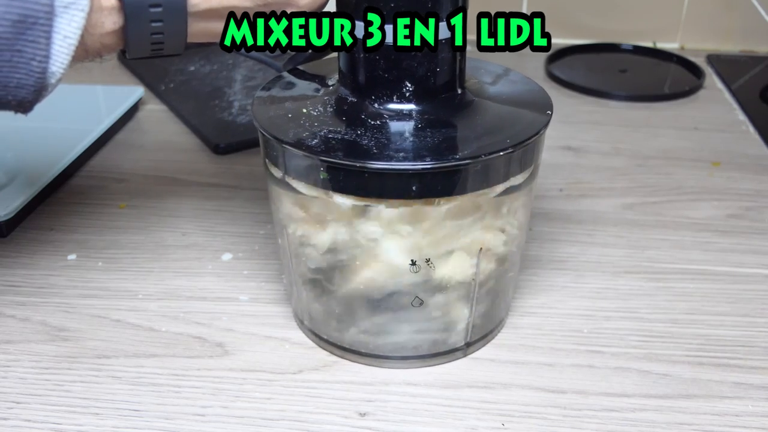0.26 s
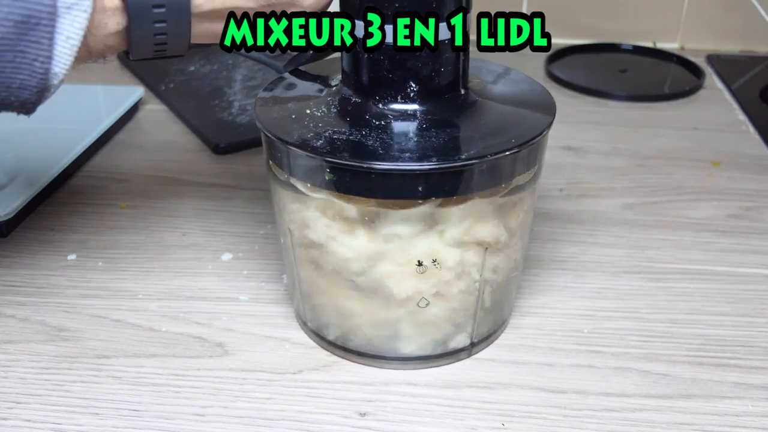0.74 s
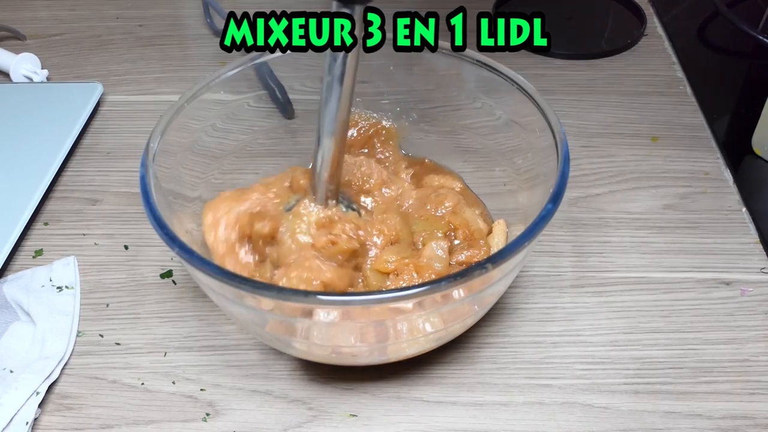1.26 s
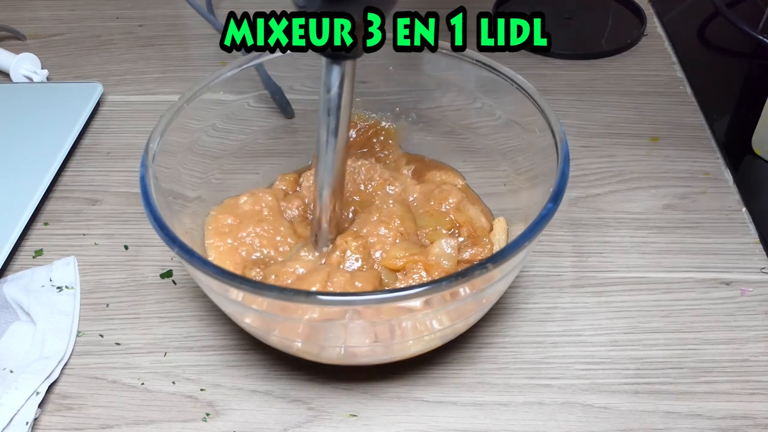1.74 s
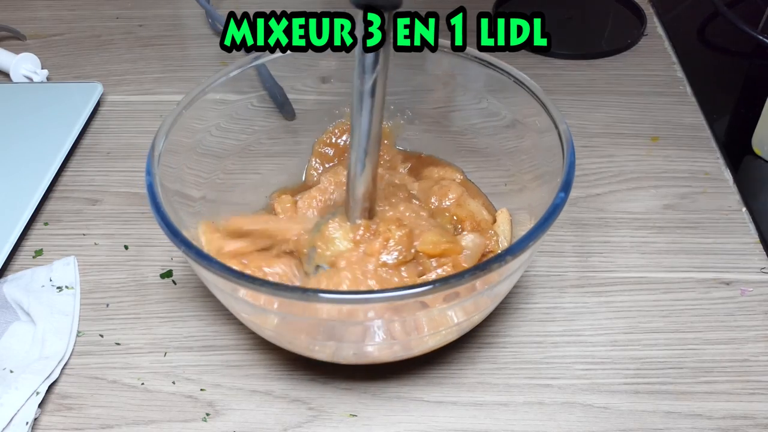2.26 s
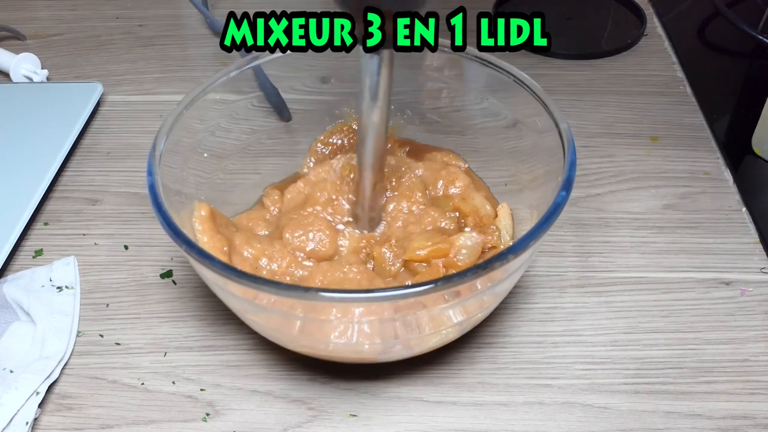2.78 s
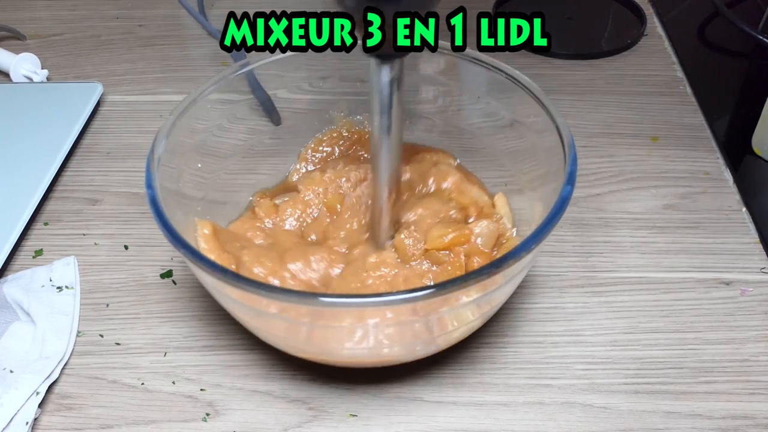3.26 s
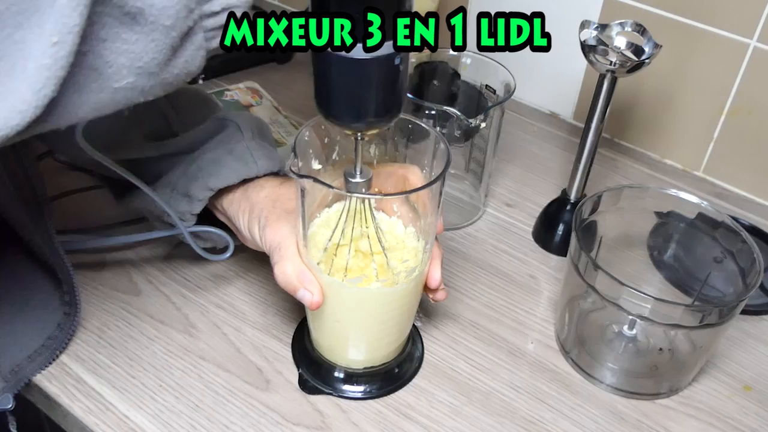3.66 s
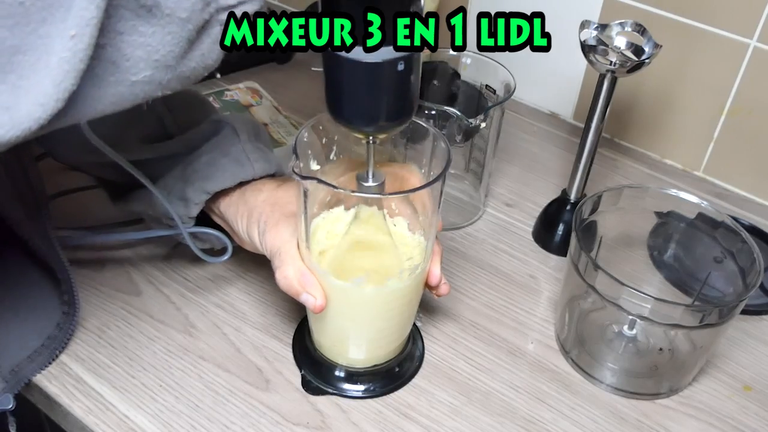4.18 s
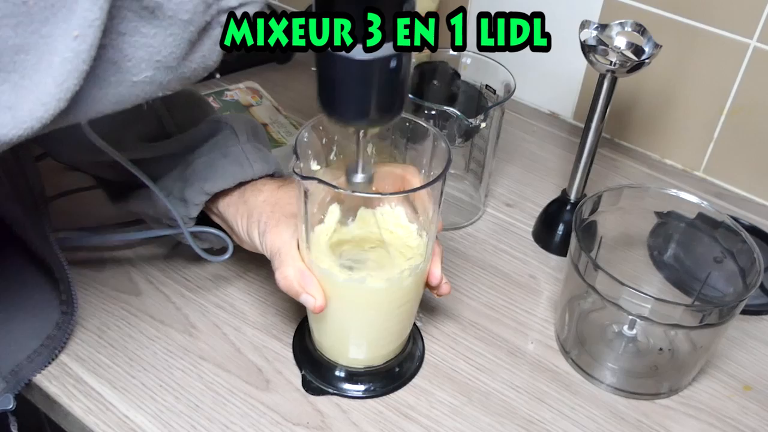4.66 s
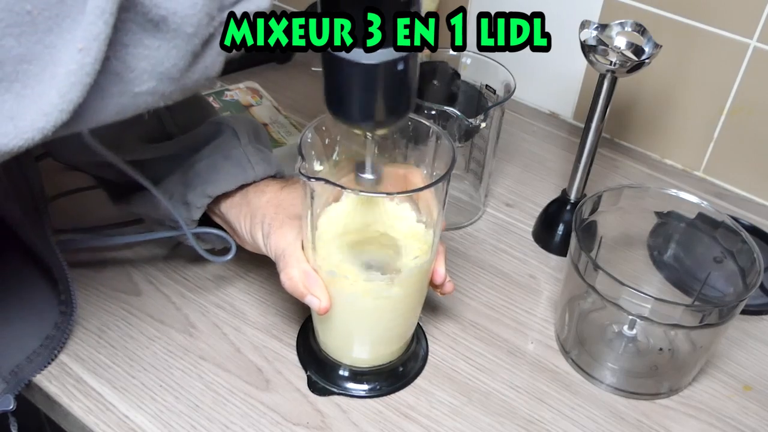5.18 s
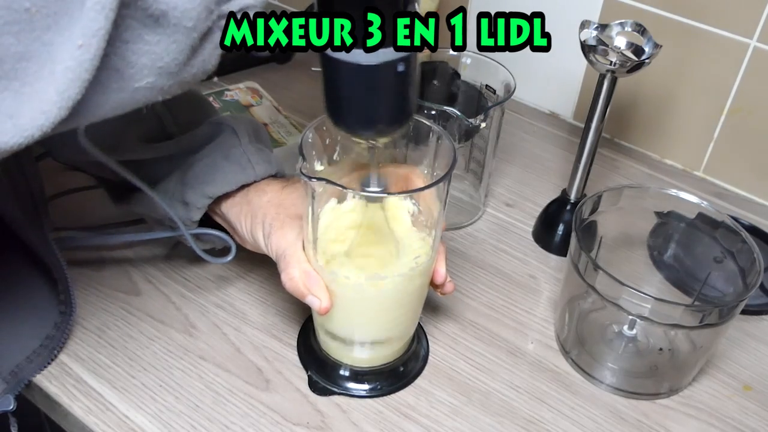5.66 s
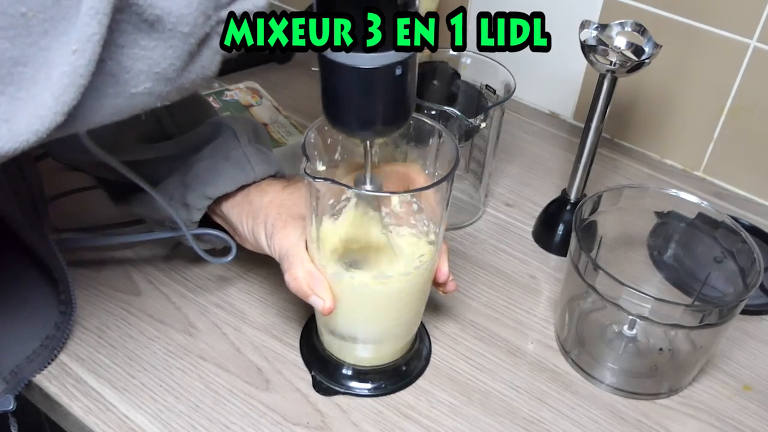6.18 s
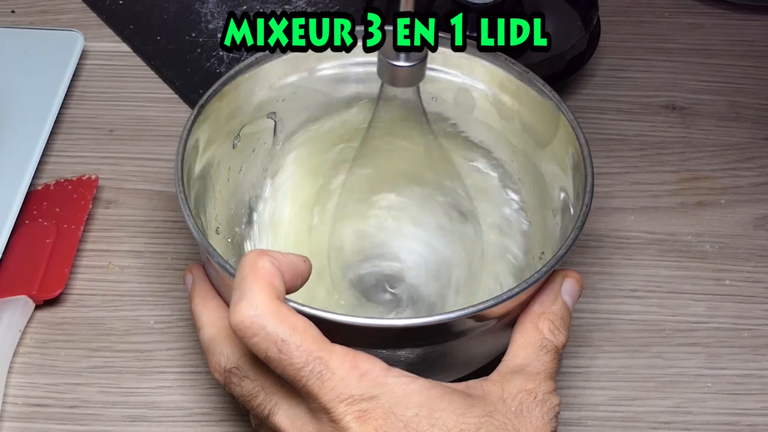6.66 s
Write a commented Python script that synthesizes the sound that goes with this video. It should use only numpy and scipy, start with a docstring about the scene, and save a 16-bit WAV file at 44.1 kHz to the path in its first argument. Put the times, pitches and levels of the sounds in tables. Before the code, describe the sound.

Four abrupt kitchen motor jobs: cracking plastic chopper, wet churning blender, click and singing geared whisk with wall taps, metallic whirring in a steel bowl.

```python
"""A chopper cracks and rattles close by as chunks fly at its plastic bowl; then a blender foot churns fruit
in a glass bowl, slurping and spraying under a high motor whine. After a quiet moment a switch clicks, and a
geared whisk spins up in a beaker and taps its wall; last, the same whisk rattles round a steel bowl.
One small motor drives all four jobs. Blows and rattles are noise through filters shaped like each vessel,
motor and gears are wandering sines, and a faint kitchen hush lies behind."""
import sys
import numpy as np
from scipy import signal
from scipy.fft import rfft, irfft, next_fast_len
from scipy.io import wavfile
from scipy.ndimage import uniform_filter1d, minimum_filter1d, map_coordinates

SR = 44100
rng = np.random.default_rng(int(sys.argv[2]) if len(sys.argv) > 2 else 0)


def pcm_store(signal):
    """Save signal as 16-bit PCM."""
    levels = np.round(np.clip(np.atleast_2d(signal), -1, 1) * 32767)
    wavfile.write(sys.argv[1], SR, levels.astype(np.int16).T)


N = 305745
T = np.arange(N) / SR  # time (s)

# treble of a blow, alike for chunks, slaps and taps: f/Hz, relative level/dB
CRACK = ([(500, -101), (3000, -17), (6000, -0.5), (11000, -5), (15500, -58)],)
# glass bowl and foot, smooth spectrum: f/Hz, relative level/dB
CHURN_BODY = [(35, -63), (60, -52), (158, -27), (313, -15.5), (375, -12.5), (520, -18), (640, -13.5),
              (810, -4.5), (1070, -9), (1370, -3.5), (3000, -27), (3900, -53), (6600, -120)]
# glass bowl and foot, resonances: f/Hz, width/Hz, height over the body/dB
CHURN_MODES = [(152, 35, 11), (263, 18, 6.5), (770, 57, -1), (860, 190, 0.5), (1400, 58, 0), (1677, 96, 4),
               (2065, 195, 5.5)]
# colour of wet pulp, in slurps and slaps: f/Hz, relative level/dB
SLURP = [(100, -120), (200, -82), (900, -14), (2200, 5.5), (3300, 3.5), (4600, 2.5), (6500, -23),
         (9000, -57.5)]
# whisk button pressed: t/s, level/dB
SWITCH = [(3.886, -27.5)]
SWITCH_S, SWITCH_DB = SWITCH[0]
# wire on the beaker wall: t/s, level/dB, brightness/dB
TAPS = [(4.72, -9, 1.5), (4.8418, -5, 1), (4.86, -1.5, -1.5), (4.8785, -7.5, -0.5), (4.951, -2, -10),
        (4.966, -8.5, 4.5), (5.0167, -10.5, 3), (5.0847, -13, 1), (5.1094, -12, 4), (5.2016, -16, 2),
        (5.214, -14, 5), (5.262, -19, 8), (5.301, -17, -1), (5.3494, -36, -11), (5.3924, -22.5, 17.5),
        (5.4902, -10, 0), (5.5044, -4.5, 4), (5.5348, -31, -6), (5.63, -18, 5), (5.662, -12, 7.5),
        (5.753, -3.5, -3), (5.7854, -27, -6), (5.8426, -12.5, 5), (5.898, -13, -6), (5.9486, -11.5, 8),
        (6.0248, -17, -7), (6.0592, -13, 2), (6.1697, -19, 8.5), (6.21, -14, 11), (6.2964, -21, -1)]


def amp(db):
    """Decibels to a linear gain."""
    return 10 ** (np.asarray(db) / 20)


def unit(x):
    """x scaled to an RMS of one."""
    return x / np.sqrt(np.mean(x ** 2) + 1e-20)


def along(points, hz):
    """(Hz, value) points read off on a log frequency axis."""
    f, v = np.transpose(points)
    return np.interp(np.log(hz + 1), np.log(f + 1), v)


def curves(rows):
    """One value per sample for each column after the time."""
    s, *cols = np.transpose(rows)
    return [np.interp(T, s, c) for c in cols]


def wobble(rate):
    """A smooth random curve, rate knots a second."""
    return map_coordinates(rng.standard_normal(int(N * rate / SR) + 4), [T * rate])


def coloured(x, body, modes=()):
    """x through a causal filter: a smooth spectrum with resonances standing on it."""
    hz = np.fft.rfftfreq(16384, 1 / SR)
    power = 1 + sum(amp(2 * db) / (1 + (2 * (hz - c) / w) ** 2) ** 2 for c, w, db in modes)
    cepstrum = irfft(np.log(amp(along(body, hz)) * np.sqrt(power) + 1e-6))
    # folding the cepstrum forward gives minimum phase
    cepstrum[1:8192] *= 2
    cepstrum[8193:] = 0
    response = irfft(np.exp(rfft(cepstrum)))[:8192]
    return signal.fftconvolve(x, response)[:N]


def decay(x, t60):
    """Each impulse of x becomes a dying step."""
    return signal.lfilter([1], [1, -amp(-60 / (t60 * SR))], x)


def gritty(rate, t60, spread_db, grit_db):
    """Steady noise plus small random impacts, rate a second, each a dying burst."""
    size_db = spread_db * rng.exponential(size=N).clip(0, 2.5)  # none far louder than the rest
    hits = (rng.random(N) < rate / SR) * amp(size_db)
    return unit((1 + amp(grit_db) * unit(decay(hits, t60))) * rng.standard_normal(N))


def blows(events, low, high=None, hard=0.69):
    """Typed impacts: a hard knock and a dying noise burst, in a low colour and perhaps again in a high colour."""
    crest_db = 15  # allowance for the peaks of a noise burst
    knock, snap, snap_t60 = 5, 2.5, .02  # first knock and early snap over the burst, snap's life (s)
    out = np.zeros(N)
    for lift, colour in enumerate((low, high) if high else (low,)):
        bursts, t = np.zeros(N + SR), T[:SR // 5]
        for s, db, bright_db, t60 in events:
            burst = amp(-60 * t / max(t60, .004)) * rng.standard_normal(len(t))
            burst *= 1 + hard * snap * amp(-60 * t / snap_t60)
            burst[0] = hard * knock
            bursts[round(s * SR):][:len(t)] += amp(db - crest_db + lift * bright_db) * burst
        norm = np.std(coloured(rng.standard_normal(N), *colour))
        out += coloured(bursts[:N], *colour) / norm
    return out


def tone(hz, blur, fuzz=0., spread=100):
    """A sine on a moving pitch, its phase wandering, with a share of narrow noise around it."""
    phase = 2 * np.pi * (np.cumsum(hz) / SR + rng.random()) + blur * wobble(60)
    in_phase = (1 + fuzz * wobble(spread)) * np.sin(phase)
    return unit(in_phase + fuzz * wobble(spread) * np.cos(phase))


def chopper():
    """The geared blade rattles the bowl's modes; chunks crack against it and ring them harder, crumbs tick."""
    # between the chunks: t/s, rattle level/dB, hiss level/dB
    run = [(0, -20, -36), (.07, -21.5, -33.5), (.105, -24.5, -38), (.15, -17.5, -33), (.23, -24.5, -36),
           (.3, -21.5, -34.5), (.5, -21, -34.5), (.7, -21, -34), (.748, -26.5, -39), (.79, -17, -27),
           (.885, -24.5, -41)]
    # blade meets a chunk: t/s, level/dB, brightness/dB, t60/s
    chunks = [(0.0143, -6, -15, 0.049), (0.0439, -5, -13, 0.055), (0.0528, -6.5, -8, 0.083),
              (0.0714, -10, -24, 0.052), (0.1163, -27, -21.5, 0.06), (0.1294, -4.5, -19, 0.097),
              (0.1482, -24, -23.5, 0.06), (0.1782, -8.5, -37, 0.071), (0.2074, -4.5, -8.5, 0.04),
              (0.2478, -5.5, -24, 0.082), (0.2789, -8, -27, 0.056), (0.3065, -4, -20, 0.087),
              (0.3284, -7, -24, 0.06), (0.344, -19, -30, 0.048), (0.3654, -6, -15.5, 0.06),
              (0.388, -2.5, -23, 0.054), (0.4214, -15, -17, 0.055), (0.4359, -4, -26, 0.12),
              (0.4634, -4.5, -29, 0.06), (0.5057, -4, -23, 0.036), (0.5234, -9, -13, 0.067),
              (0.5404, -5, -20, 0.053), (0.5554, -4, -29, 0.053), (0.6093, -8, -17, 0.1),
              (0.637, -6, -29, 0.078), (0.6645, -4, -32, 0.06), (0.6834, -2, -25, 0.054),
              (0.7176, -8, -21, 0.06), (0.7603, -4.5, -20, 0.06), (0.7789, -1, -21, 0.06),
              (0.799, -3.5, -29, 0.073), (0.825, -2, -16, 0.072)]
    # plastic bowl, smooth spectrum: f/Hz, relative level/dB
    body = [(35, -77), (60, -47.5), (227, -12), (559, -16), (895, -8.5), (1830, -7), (2180, -8), (2340, -4),
            (2620, -5.5), (2990, -8.5), (3250, -16.5), (3670, -12), (4890, -17), (8000, -43), (10400, -75),
            (17600, -120)]
    # plastic bowl, resonances: f/Hz, width/Hz, height over the body when rattled/dB
    modes = [(752, 33, 6.5), (911, 28, 7), (1380, 19, 4.5), (1606, 41, 1), (1997, 122, 6), (2278, 105, 10),
             (2410, 60, 5.5), (2473, 120, 8.5), (2730, 160, 3.5), (3250, 155, 15), (4180, 80, 9),
             (5430, 120, 5), (5330, 1570, 9)]
    # treble hiss of fine crumbs: f/Hz, relative level/dB
    hiss_colour = [(3240, -23), (5500, -13), (6170, -8.5), (8480, -10.5), (11700, -14.5), (12700, -17),
                   (15800, -27)]
    # hard crumbs on the wall: t/s, level/dB, t60/s
    hard_crumbs = [(0.0144, -22.5, 0.012), (0.0438, -24.5, 0.012), (0.0613, -15, 0.012),
                   (0.1301, -17, 0.012), (0.201, -19, 0.012), (0.3697, -14, 0.012), (0.4125, -23, 0.012),
                   (0.4297, -16, 0.012), (0.5286, -15, 0.012), (0.5501, -19, 0.012), (0.61, -25, 0.012),
                   (0.7547, -31, 0.012), (0.7682, -17, 0.012), (0.824, -21, 0.012)]
    # colour of a crumb's tick: f/Hz, relative level/dB
    tick_colour = [(3000, -46), (6500, -20), (8500, 7), (11000, -12), (15500, -20)]
    rattle_db, hiss_db = curves(run)
    bits = gritty(rate=400, t60=0.012, spread_db=1.5, grit_db=-6)
    crumbs = gritty(rate=200, t60=0.008, spread_db=1.5, grit_db=-9)
    rattle = amp(rattle_db) * unit(coloured(bits, body, modes))
    hiss = amp(hiss_db) * unit(coloured(crumbs, hiss_colour))
    struck = [(hz, width, 1.36 * db) for hz, width, db in modes]
    cracks = blows(chunks, (body, struck), CRACK)
    ticks = blows([(s, db, 0, t60) for s, db, t60 in hard_crumbs], (tick_colour,))
    return rattle + hiss + cracks + ticks


def blender():
    """Pulp thuds in the bell-shaped foot, air is drawn in, bowl and blade hum, and the motor sings high."""
    return churn() + drawn_air() + bowl_hum() + motor_whine() + splats() + thuds()


def churn():
    """Lumps of pulp tumble in the foot: gritty noise through the resonances of glass bowl and foot."""
    # load of pulp on the blade: t/s, level/dB
    load = [(0.89, -22.5), (0.93, -23.5), (1.26, -21.5), (1.3, -29), (1.31, -23.5), (2.15, -22),
            (2.42, -25.5), (2.46, -32.5), (2.47, -26.5), (2.62, -20.5), (2.64, -25), (2.7, -24),
            (3.18, -22.5), (3.21, -24), (3.71, -22), (3.73, -22.5)]
    churn_db, = curves(load)
    lumps = gritty(rate=110, t60=0.11, spread_db=2.0, grit_db=-7.0)
    return amp(churn_db) * unit(coloured(lumps, CHURN_BODY, CHURN_MODES))


def drawn_air():
    """Air drawn into the foot makes wet, flickering slurps and a brighter spray."""
    # spray: f/Hz, relative level/dB
    spray_colour = [(2940, -43), (5000, 7), (6090, 1.5), (7380, 6.5), (8410, 4), (9710, 0), (12800, 0),
                    (14800, -13), (15800, 0)]
    slurp_gain, spray_gain = gulps()
    wet = gritty(rate=130, t60=0.017, spread_db=5.0, grit_db=-11)
    drops = gritty(rate=72, t60=0.0087, spread_db=4.5, grit_db=-13.0)
    slurp = unit(coloured(wet, SLURP, [(3350, 550, 7.5)]))
    spray = unit(coloured(drops, spray_colour, [(9850, 1150, 5.9), (14300, 900, 4)]))
    return slurp_gain * amp(.8 * wobble(24)) * slurp + spray_gain * amp(1.6 * wobble(30.04)) * spray


def gulps():
    """Gains of slurp and spray: each gulp swells, holds and fades over a steady base."""
    # the foot draws air: t/s, length/s, slurp level/dB, spray level/dB
    gulp_rows = [(1.211, 0.036, -32, -35), (1.38, 0.059, -35.5, -35.5), (1.686, 0.026, -38, -35.5),
                 (1.786, 0.1, -27.5, -37.5), (2.223, 0.31, -32.5, -31.5), (2.517, 0.15, -31.5, -30.5),
                 (2.688, 0.26, -30, -40.5), (2.97, 0.09, -31, -39.5), (3.148, 0.11, -27, -37.5),
                 (3.365, 0.18, -34.5, -48), (3.503, 0.18, -31, -38), (3.658, 0.096, -28.5, -40)]
    attack_s, release_s = 0.028, 0.057
    base_db = np.array([[-40], [-41]])  # slurp and spray with the foot under the pulp
    level_db = base_db + np.zeros(N)
    for s, length, *db in gulp_rows:
        rise = (T - s) / attack_s
        fall = 1 - (T - s - length) / release_s
        shape = np.clip(np.minimum(rise, fall), 0, 1)
        level_db = np.maximum(level_db, base_db + (np.array(db)[:, None] - base_db) * shape)
    return amp(level_db)


def bowl_hum():
    """The bowl hums on a fixed pitch and the blade on a moving one, both blurred by narrow noise."""
    # bowl hum: t/s, level/dB
    hum_level = [(0.89, -50), (0.97, -26.5), (1.02, -48), (1.17, -33), (1.2, -48), (1.65, -33),
                 (1.81, -49.5), (2.23, -32.5), (2.29, -25.5), (2.42, -45.5), (2.49, -37.5), (3.66, -40.5),
                 (3.73, -39)]
    # blade tone: t/s, level/dB
    blade_level = [(.89, -40.5), (1.1, -29), (1.2, -44), (1.45, -35.5), (1.75, -31.5), (2.0, -46),
                   (2.7, -40), (2.8, -31), (2.93, -50), (2.98, -30), (3.17, -26), (3.22, -36),
                   (3.36, -26.5), (3.5, -33.5), (3.56, -25.5), (3.73, -27)]
    # blade tone: t/s, f/Hz
    blade_pitch = [(.9, 770), (1.5, 762.5), (2.1, 770), (2.75, 796.6), (2.95, 810), (3.2, 812),
                   (3.4, 799.5), (3.55, 812), (3.73, 814)]
    (hum_db,), (blade_db,), (blade_hz,) = curves(hum_level), curves(blade_level), curves(blade_pitch)
    bowl = tone(np.full(N, 381.), blur=0.49, fuzz=.7, spread=44)
    smear = np.where(T < 2.93, 1.2, .35)  # smeared until the pulp thins
    blade = tone(blade_hz, blur=0.3, fuzz=smear, spread=50)
    return amp(hum_db + 2 * wobble(16)) * bowl + amp(blade_db + 1.2 * wobble(14)) * blade


def motor_whine():
    """The commutator sings high, with tones at half and two thirds of its pitch."""
    # commutator: t/s, f/Hz, level/dB, level at half that pitch/dB
    whine = [(.9, 14600, -60, -54), (1.3, 14420, -60, -53), (1.76, 14380, -58, -54),
             (1.88, 14580, -57, -54), (2.25, 14620, -58, -51), (2.7, 14420, -59, -57),
             (3.2, 14500, -61, -57), (3.5, 14600, -61, -54), (3.73, 14800, -63, -55)]
    hz, db, half_db = curves(whine)
    out = amp(db + 2.9 * wobble(5.2)) * tone(hz, blur=2.5, fuzz=3.5, spread=400)
    out += amp(half_db + 2.2 * wobble(12.0)) * tone(hz / 2, blur=0.53, fuzz=0.48)
    out += amp(-47.5 + 1.5 * wobble(7.9)) * tone(hz * 2 / 3, blur=2.1, fuzz=3.5, spread=600)
    return out


def splats():
    """Pulp slaps the glass: each slap bursts broadly and rings the pocket of air it traps."""
    # slaps: t/s, level/dB, brightness/dB, air pocket f/Hz
    slaps = [(1.247, -20, -6, 4200), (1.259, -21, -3, 8200), (1.431, -19.5, -3, 8500),
             (1.444, -23, 0, 8000), (1.455, -22, -1, 8600), (1.6402, -22.5, -12, 3900),
             (1.722, -22.5, -0.5, 4600), (1.8048, -20, -12, 3340), (1.9978, -28, -2, 3140),
             (2.2506, -17, 0, 7400), (2.287, -26, -2, 7000), (2.3004, -25, -2, 7500),
             (2.3763, -12, -7, 2760), (2.4059, -25, -10, 4200), (2.4544, -14, -7, 4720),
             (2.544, -24, -10, 2650), (2.5787, -18, 4, 3500), (2.618, -14, -1.5, 3620),
             (2.6383, -8.5, -1, 3750), (2.653, -13, -16, 3200), (2.688, -21, -13.5, 3400),
             (2.822, -18, -16, 3380), (2.997, -18.5, -9.5, 3310), (3.115, -21.5, -18, 3340),
             (3.188, -15, -10, 3380), (3.2325, -20, -12, 3400), (3.3829, -15.5, -22, 3400),
             (3.532, -13.5, -18, 3380), (3.5792, -17.5, -6, 3440), (3.6342, -18.5, -14, 3300),
             (3.7184, -15, -12, 3464)]
    t60, pocket_q, pocket_cut_db = 0.039, 22, 10  # burst life (s), ring sharpness, ring under the slap level
    out = blows([(*row[:3], t60) for row in slaps], (SLURP,), CRACK)
    t = T[:SR // 20]
    for s, db, _, hz in slaps:
        ring = np.exp(-np.pi * hz / pocket_q * t) * np.cos(2 * np.pi * hz * t)
        noise = amp(-60 * t / t60) * rng.standard_normal(len(t))
        burst = np.convolve(noise, ring / np.linalg.norm(ring))
        out[round(s * SR):][:len(t)] += amp(db - pocket_cut_db) * burst[:len(t)]
    return out


def thuds():
    """A lump strikes inside the foot and rings glass and foot in a short, softened burst."""
    # lumps: t/s, level/dB
    lumps = [(1.47, -3), (1.528, -8), (1.595, -8), (1.969, -2.5), (1.992, -12), (2.089, -5), (2.129, -11),
             (2.804, -14), (3.143, -7), (3.581, -28)]
    return blows([(s, db, 0, 0.027) for s, db in lumps], (CHURN_BODY, CHURN_MODES), hard=0.29)


def whisk():
    """Planet gears sing, teeth rush and wires swish once the switch clicks; wires tap the beaker."""
    # gear tone: t/s, f/Hz
    speed = [(3.89, 702.2), (3.922, 1260), (3.948, 1570), (3.985, 1750), (4.03, 1850), (4.09, 1935),
             (4.17, 1990), (4.3, 2006), (4.5, 1990), (4.75, 1980), (5.1, 1986), (5.7, 1986), (6.33, 1978)]
    # working levels: t/s, tone level/dB, octave level/dB, gear noise level/dB, swish of the wires level/dB
    load = [(3.89, -70, -56, -40, -38), (3.912, -38, -36, -26.5, -40), (3.922, -24, -32, -22, -32),
            (3.94, -21.5, -29.5, -23, -31), (3.97, -28, -30.5, -24, -31), (4.0, -22, -37, -19, -29.5),
            (4.05, -33, -39, -22, -33), (4.15, -27.5, -27.5, -24, -34.5), (4.45, -32, -30.5, -24, -37),
            (4.75, -29, -30, -26, -36), (5.3, -32, -34, -27, -36), (5.462, -28.5, -34, -25.5, -34),
            (5.472, -42, -32, -25.5, -36), (5.525, -42, -35, -29, -39), (5.54, -31, -33.5, -27, -36),
            (5.8, -30, -37, -27, -37.5), (6.33, -33, -32.5, -27, -35.5)]
    # gear housing, smooth spectrum: f/Hz, relative level/dB
    body = [(53, -76), (90, -35), (231, -24), (858, -17.5), (1310, -9), (1820, -7.5), (1960, -2),
            (2380, -11.5), (4010, -10.5), (4410, -12.5), (9000, -20.5), (11700, -29.5), (19800, -120)]
    # gear housing, resonances: f/Hz, width/Hz, height over the body/dB
    modes = [(228.4, 18, 10.5), (673, 230, 3.5), (1247, 41, 4.5), (1603, 75, 5.5)]
    # swish of the wires: f/Hz, relative level/dB
    swish_colour = [(3240, -46.5), (5500, 3), (6030, 4), (6480, 3.5), (9850, 6.5), (12500, -1.5),
                    (14200, 0), (15800, -13)]
    turn_cycles, beat_cycles = 108, 270  # gear-tone cycles in a turn of the whisk, in a slow beat of the planets
    beat_top_s = 5.43  # a loud moment of the beat
    hz, = curves(speed)
    tone_db, octave_db, rush_db, swish_db = curves(load)
    cycles = np.cumsum(hz) / SR
    # counted from a moment when the gears bite hardest
    turn = 2 * np.pi * (cycles - np.interp(4.287, T, cycles)) / turn_cycles
    beat = 2 * np.pi * (cycles - np.interp(beat_top_s, T, cycles)) / beat_cycles + 0.12 * wobble(7.5)
    song = gear_song(hz, turn, beat, tone_db, octave_db) + bites(turn + .35)
    teeth = gritty(rate=250, t60=.02, spread_db=1.5, grit_db=-9.5) * throb(turn, 0.4, 0.4)
    rush = amp(rush_db) * unit(coloured(teeth, body, modes))
    scrape_db = -2.5 * np.cos(beat) * (T > 5.6)  # from 5.6 s wires scrape the wall in each trough of the beat
    swish = amp(swish_db + scrape_db) * unit(coloured(teeth, swish_colour, [(7900, 430, 6.3)]))
    running = np.clip((T - SWITCH_S) / .004, 0, 1)
    return running * (song + rush + swish + wire_scratch()) + wall_taps() + switch_click()


def throb(turn, turn_db, planet_db):
    """Gain that swells once a turn and once for each of three planets."""
    return amp(turn_db * np.cos(turn) + planet_db * np.cos(3 * turn + 0.2 * wobble(7.8)))


def gear_song(hz, turn, beat, tone_db, octave_db):
    """Meshing teeth sing on a tone and its multiples, throbbing with turn and planets under a slow beat."""
    # weaker partner of the tone: t/s, share of the tone's amplitude
    partner = [(3.9, .2), (4.5, .3), (4.7, .55), (4.9, .4), (5.07, .7), (5.35, .65), (5.62, .6), (6.33, .5)]
    # side tones: t/s, two thirds level/dB, third multiple level/dB, just over the octave level/dB
    partials = [(3.9, -61, -46, -53), (3.95, -42, -29, -38), (3.995, -29, -32, -38), (4.01, -35, -40, -29),
                (4.04, -36, -33, -31), (4.08, -38, -38, -39), (4.15, -31.5, -34.5, -42),
                (4.35, -31, -38.5, -37), (4.6, -38.5, -36, -41), (5.2, -41, -41.5, -40.5),
                (6.33, -43, -42, -47)]
    # weaker tones: multiple of the gear tone
    multiples = [.786, 1.119, 1.444, 3.985]
    # the weaker tones in the same order: level before start-up strain/dB
    multiples_db = [-47, -41, -52, -40.5]
    # teeth are loaded hardest while the motor gathers speed
    strain_db = 5 * amp(-60 * (T - SWITCH_S).clip(0) / 1.0)
    # the first climb is clean, then the teeth chatter
    chatter_db = strain_db * np.clip((T - 3.94) / .03, 0, 1)
    # the gears take up their slack first
    meshed = np.clip((T - SWITCH_S) / .04, 0, 1) ** 2
    share = curves(partner)[0] * amp(wobble(3.7))
    beating = np.abs(1 + share * np.exp(1j * beat) + .15 * np.exp(3j * beat))
    pulse = amp(2 * np.cos(turn - 1)) * throb(turn, 0, 1.2 + 1.5 * chatter_db)
    main = tone(hz, blur=0.3, fuzz=0.15 * amp(2 * chatter_db), spread=170)
    song = amp(tone_db) * beating * pulse * main
    octave_pulse = throb(turn, 1, 3.5) * amp(2.5 * np.cos(2 * turn))
    song += amp(octave_db + wobble(12)) * octave_pulse * tone(2 * hz, blur=0.6, fuzz=0.6, spread=250)
    low_db, third_db, over_db = curves(partials)
    song += amp(over_db) * throb(turn, 1, 3) * tone(hz * 2.1, blur=.3, fuzz=.8, spread=150)
    song += amp(low_db) * tone(hz * 2 / 3, blur=.2, fuzz=0.65, spread=60)
    song += amp(third_db) * throb(turn, 1, 3.5) * tone(hz * 2.978, blur=.6, fuzz=.8, spread=250)
    for k, db in zip(multiples, multiples_db):
        weak = tone(k * hz, blur=0.14 * k, fuzz=0.98, spread=70 * k)
        song += meshed * amp(db + 1.6 * strain_db) * weak
    return song


def bites(turn):
    """Once a turn, after 4.1 s, a proud tooth rings the housing briefly, fading as the gears settle."""
    hz, t60, fade_db_per_s = 4030, .035, 9
    at = np.flatnonzero(np.diff(np.floor(turn / (2 * np.pi)))) / SR
    out, t = np.zeros(N + SR), T[:SR // 10]
    ring = amp(-60 * t / t60) * np.sin(2 * np.pi * hz * t) * (1 - np.exp(-t / 0.0011))
    for s, chance in zip(at, rng.standard_normal(len(at))):
        if s > 4.1:
            out[round(s * SR):][:len(t)] += amp(-16 + 1.4 * chance - fade_db_per_s * (s - 3.5)) * ring
    return out[:N]


def wire_scratch():
    """A wire drags along the wall: bright grit swells fast into each tap and trails off."""
    # scratch: f/Hz, relative level/dB
    colour = [(5000, -51), (8000, -14), (12000, 6), (15800, 2)]
    under_tap_db, trail_s = -27.5, 0.02  # level against the tap's, spread of the trail
    swell = np.zeros(N)
    for s, db, bright_db in TAPS:
        width = np.where(T < s, trail_s / 3, trail_s)
        swell += amp(db + bright_db + under_tap_db) * np.exp(-((T - s) / width) ** 2)
    return swell * unit(coloured(gritty(rate=110, t60=.012, spread_db=-1.0, grit_db=-2.0), colour))


def wall_taps():
    """Wires strike the beaker wall; batter on it cushions each tap, so the first knock is weak."""
    wall = ([(100, -90), (500, -26), (1500, -42.0), (3800, -7.5), (6000, -23.0), (9000, -27.0)],)
    return amp(-2) * blows([(*row, 0.076) for row in TAPS], wall, CRACK, hard=.08)


def switch_click():
    """The button rings as a few dying sines."""
    # button: f/Hz, level relative to the switch/dB, t60/s
    button = [(4030, -1.5, 0.049), (6400, -3, 0.0078), (9100, -17, 0.018), (9938, -11, 0.021)]
    t = T - SWITCH_S
    rings = [amp(SWITCH_DB + db - 60 * t.clip(0) / t60) * np.sin(2 * np.pi * f * t) for f, db, t60 in button]
    return (t > 0) * sum(rings)


def steel_bowl():
    """Wires skim the steel many times a turn, partly in the same pattern each turn, and keep its modes ringing."""
    # skim: f/Hz, share of power that recurs alike each turn
    repeats = [(300, .5), (1100, .3), (3000, .18), (5500, .08), (10000, .05)]
    # steel bowl, smooth spectrum: f/Hz, relative level/dB
    body = [(35, -81), (60, -49), (202, -29), (273, -14.5), (513, -19.5), (630, -16.5), (856, -8),
            (2280, 2.5), (2500, -5.5), (3630, -3.5), (9240, -9.5), (14400, -21.5), (15800, -35)]
    # steel bowl, resonances: f/Hz, width/Hz, height over the body/dB
    modes = [(281, 17, 5), (496, 12, 7.5), (858, 29, 7.5), (1280, 150, 4), (1616, 19, 8), (1950, 120, -5),
             (2440, 29, 8.5), (2760, 97, 6.5), (3200, 92, 5.5), (3570, 200, 2.5), (4200, 190, 1.5),
             (4760, 150, 1), (5700, 74, 6.5), (5900, 80, -19), (7300, 390, 4), (8530, 250, 4.5),
             (11900, 40, 6)]
    turn_hz, rattle_db = 19.1, -23  # turns a second, mean level
    turn_db = 0.87 * np.sin(2 * np.pi * turn_hz * T + 1.9)
    fresh = gritty(rate=500, t60=0.0053, spread_db=5, grit_db=-9)
    again = np.resize(rng.standard_normal(round(SR / turn_hz)), N)  # one turn of noise, looped
    m = next_fast_len(N)
    share = along(repeats, np.fft.rfftfreq(m, 1 / SR))
    skim = irfft(rfft(fresh, m) * np.sqrt(1 - share) + rfft(again, m) * np.sqrt(share), m)[:N]
    return amp(rattle_db + turn_db) * unit(coloured(skim, body, modes))


def thumps():
    """Dull knocks on the worktop, each a few damped cycles with a soft start."""
    # knocks: t/s, level/dB, f/Hz
    knocks = [(2.27, -61, 80), (2.646, -30.5, 152), (4.531, -29.5, 473), (4.95, -43, 167)]
    out = np.zeros(N)
    for s, db, hz in knocks:
        cycles = (T - s).clip(0) * hz
        out += amp(db) * np.sin(2 * np.pi * cycles) * cycles * np.exp(1 - cycles / 1.08)
    return out


def kitchen_hush():
    """The kitchen at rest: separate coloured noise for each ear, and thin whistles in the middle."""
    # room noise: f/Hz, relative level/dB
    quiet = [(24, -60), (40, -16), (611, -4.5), (710, -20.5), (846, -11.5), (4750, -27), (6920, -26),
             (8240, -24.5), (15800, -27)]
    # thin whistles: f/Hz, level/dB, rate of their noise/Hz
    faint = [(2860, -74, 500), (7100, -71, 150), (7160, -76.5, 200)]
    out = amp(-60.5) * np.array([unit(coloured(rng.standard_normal(N), quiet)) for _ in "LR"])
    for hz, db, width in faint:
        out += amp(db) * tone(np.full(N, hz), blur=.5, fuzz=2.5, spread=width)
    return out


def placed(x, lean_db, spread_db):
    """Direct sound leaning to one side, plus an ever shifting diffuse part from the tiles, unlike in each ear."""
    # diffuse part: f/Hz, level before the job's own offset/dB
    width = [(40, -30), (110, -15), (200, -13.5), (380, -9.5), (700, -11), (1290, -12.5), (2380, -13),
             (4400, -14), (8120, -14), (11000, -4), (15000, -4)]
    hz, _, z = signal.stft(x, SR, nperseg=256)
    a, b = uniform_filter1d(rng.standard_normal((2, *z.shape)), size=15, axis=2)
    diffuse = z * (unit(a) + 1j * unit(b)) * amp(along(width, hz) + spread_db)[:, None]
    side = signal.istft(diffuse, SR, nperseg=256)[1][:N]
    return np.array([x + side, x - side]) * amp([[lean_db / 2], [-lean_db / 2]])


def scene():
    """The four jobs follow one another with abrupt joins, over the kitchen's own hush."""
    # borders of the jobs, each starting where the one before stops: t/s
    cuts = [0, .889, 3.7315, 6.329, 7]
    # each job: direct sound, left minus right level/dB
    leans = [-1.1, -0.22, -1.1, -0.87]
    # each job: offset of the diffuse part, level/dB
    spreads = [1, -1.6, 0.42, 0.12]
    jobs = (chopper, blender, whisk, steel_bowl)
    out = kitchen_hush()
    for job, lean_db, spread_db, start, stop in zip(jobs, leans, spreads, cuts, cuts[1:]):
        already_on = (start == 0) * (T < .1)  # the first job is running from the outset
        shown = np.clip(np.minimum(T - start, stop - T) / .001 + .5 + already_on, 0, 1)
        out += shown * placed(job(), lean_db, spread_db)
    return out + thumps()


def record(dry):
    """A limiter ducks after each peak and recovers; the microphone colours the treble up to a band limit."""
    # microphone: f/Hz, level/dB
    mic = [(8000, 0), (9500, 0.9), (11500, -0.9), (12500, -7), (14300, 1), (15000, -3), (15600, -5)]
    top_hz = 15900  # nothing passes above
    need = np.minimum(1, (.3 / (np.abs(dry).max(0) + 1e-9)) ** .7)
    gain = uniform_filter1d(minimum_filter1d(need, size=900, origin=400), size=600, origin=250)
    m = next_fast_len(N + 8192)
    hz = np.fft.rfftfreq(m, 1 / SR)
    return irfft(rfft(dry * gain, m) * amp(along(mic, hz)) * (hz < top_hz), m)[:, :N]


dry = scene()
out = record(dry)
pcm_store(out)
```